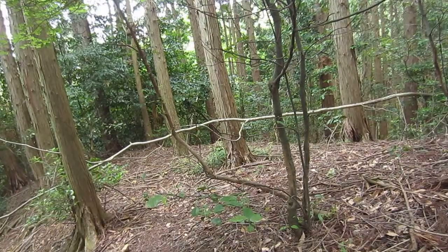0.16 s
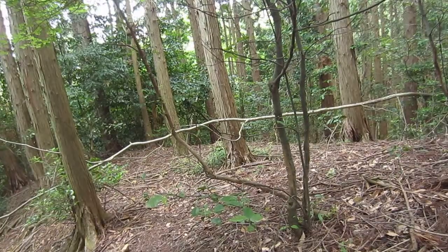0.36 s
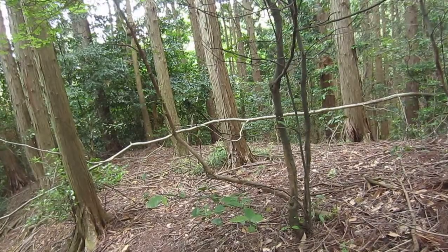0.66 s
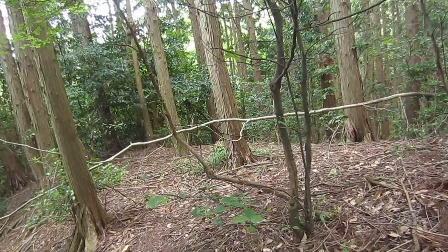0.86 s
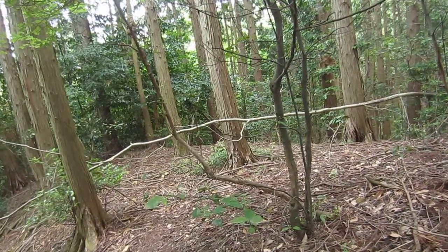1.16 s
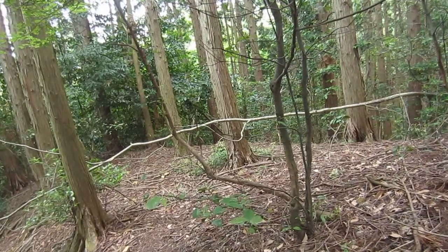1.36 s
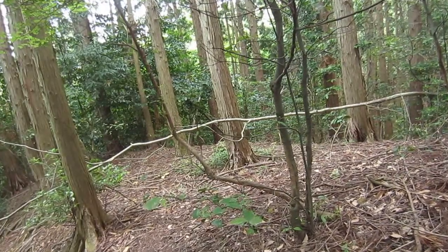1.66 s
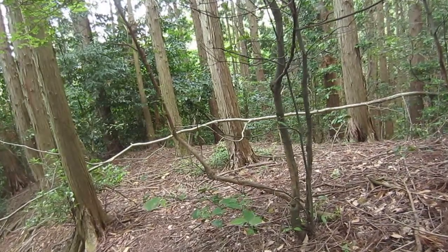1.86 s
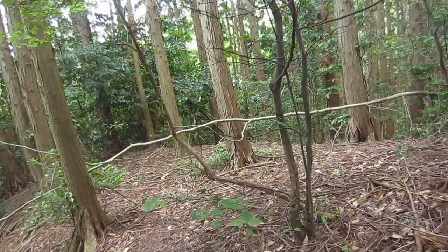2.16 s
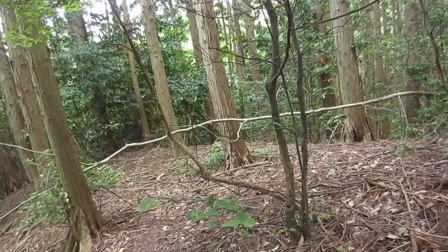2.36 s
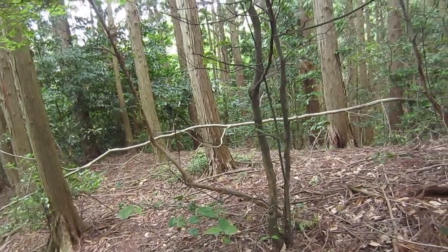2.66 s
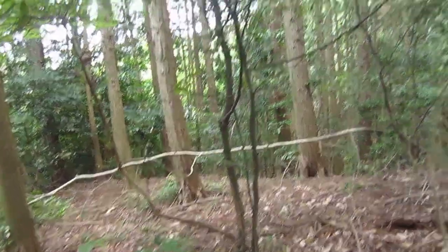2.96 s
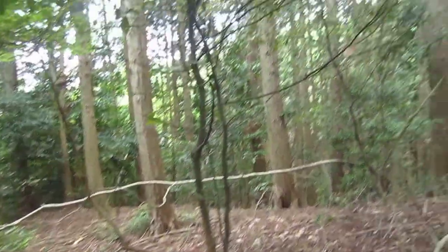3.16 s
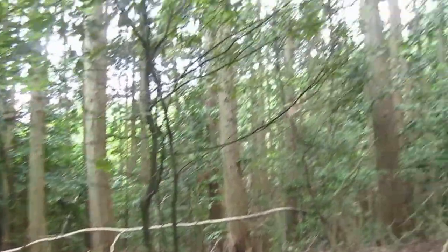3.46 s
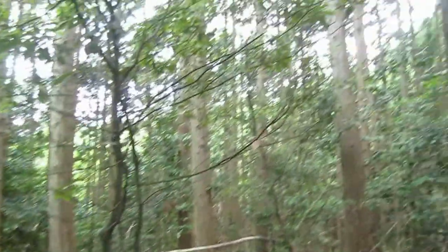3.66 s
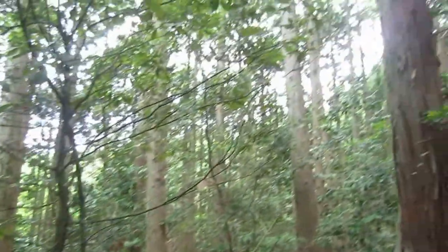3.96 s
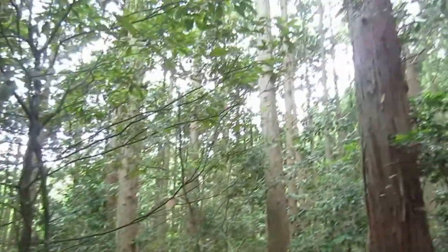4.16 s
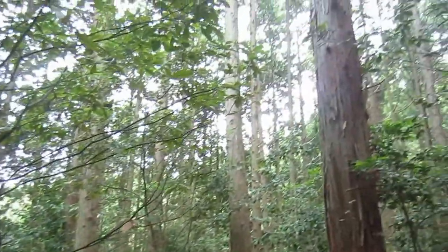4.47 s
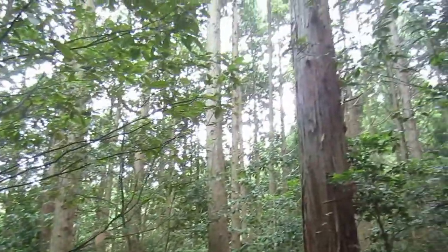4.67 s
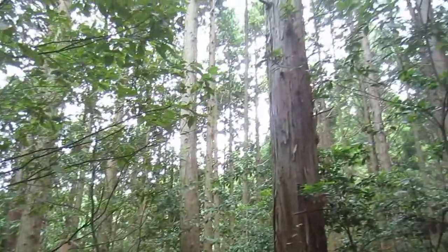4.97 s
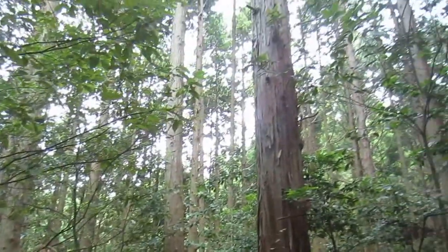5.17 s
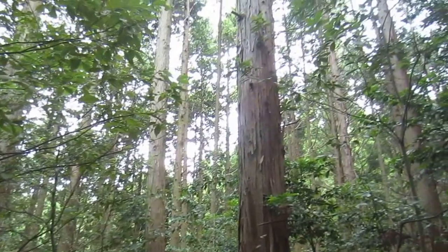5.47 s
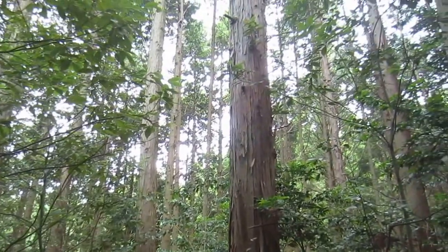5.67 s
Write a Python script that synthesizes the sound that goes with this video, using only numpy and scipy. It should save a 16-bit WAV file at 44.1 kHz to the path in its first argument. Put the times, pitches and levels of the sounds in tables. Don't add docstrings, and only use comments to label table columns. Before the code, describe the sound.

Six bright birdsong phrases of quick upward whistles and rippling trills ring among the trunks, over low air noise and faint camera ticks.

```python
import sys
import numpy as np
from scipy import signal
from scipy.fft import irfft
from scipy.io import wavfile
from scipy.ndimage import uniform_filter1d

SR = 44100
rng = np.random.default_rng(int(sys.argv[2]) if len(sys.argv) > 2 else 0)


def output_pcm(signal):
    pcm = np.clip(np.atleast_2d(signal).T, -1, 1) * 32767
    wavfile.write(sys.argv[1], SR, np.round(pcm).astype(np.int16))


def boost(x):
    u = np.asarray(x, float) / 20
    return 10 ** u


N = 256662


def singer():
    out = np.zeros((2, N))
    sing_opening(out)
    sing_whistles(out)
    sing_trills(out)
    sing_slurs(out)
    sing_far_birds(out)
    return out


def sing_opening(out):
    # time in seconds, pitch in Hz, level in dB.
    opening = [
        [(0, 3540, -39), (.03, 3345, -54), (.07, 3600, -53), (.085, 3780, -44.5), (.1, 4190, -44),
         (.122, 4210, -48.5)],
        [(.122, 3626, -50), (.155, 3600, -37), (.185, 3607, -54.5), (.29, 3600, -64)],
        [(.314, 2730, -63), (.34, 2597, -46), (.38, 2498, -49), (.415, 2434, -50.5), (.44, 2407, -44)],
        [(.42, 2730, -35.5), (.435, 3370, -55.5), (.447, 3838, -46), (.503, 3800, -40.5), (.53, 3807, -57.5),
         (.62, 3840, -64), (.72, 3780, -76)],
    ]
    opening_echo_db = [-2, -11, -0.5, -7]
    for note, echo_db in zip(opening, opening_echo_db):
        s, hz, db = np.transpose(note)
        t = np.arange(s[0], s[-1], 1 / SR)
        voice = syrinx(np.interp(t, s, hz), boost(np.interp(t, s, db)), edge_s=0.0048, warble=0.00057)
        add(out, s[0], voice, echo_db)


def sing_whistles(out):
    # start in seconds, length in seconds, held pitch in Hz, level in dB.
    whistles = [
        [(1.05, 0.067, 3257, -50), (1.278, 0.068, 3215, -48), (1.399, 0.022, 3147, -47.5)],
        [(1.887, 0.078, 3256, -44), (2.092, 0.081, 3150, -44.5), (2.2, 0.034, 3220, -48.5)],
        [(2.863, 0.084, 3222, -44.5), (3.055, 0.05, 3240, -41.5), (3.163, .04, 3180, -42)],
        [(3.694, 0.0477, 3299, -36), (3.897, 0.062, 3230, -38.5), (3.997, 0.053, 3252, -40.5)],
        [(4.502, 0.055, 3280, -37.5), (4.708, 0.055, 3194, -38.5), (4.813, 0.029, 3273, -34.5)],
        [(5.308, 0.053, 3252, -38), (5.499, 0.041, 3237, -40), (5.6, 0.043, 3235, -40)],
    ]
    # start pitch in Hz, rise in Hz per second,
    # Hz left to creep up after the knee.
    shapes = [(2280, 54000, 197), (2123, 60000, 150), (2697, 51200, 148.6)]
    for phrase in whistles:
        for (s, length, held_hz, db), (low_hz, scoop_hz_per_s, knee_hz) in zip(phrase, shapes):
            t = np.arange(0, length, 1 / SR)
            creep = held_hz - knee_hz * np.exp(-t / 0.0262)
            hz = np.minimum(low_hz + scoop_hz_per_s * t, creep)
            hz = uniform_filter1d(hz, size=200, mode="nearest")
            gain = boost(db - 0.014 * (creep - hz) - 2.6 * (2.5 - t / length))
            voice = syrinx(hz, gain, edge_s=0.0036, warble=0.0076, low_octave_db=-14)
            echo_db = 3 - 0.33 * (db + 43.5)
            add(out, s, voice, echo_db)


def sing_trills(out):
    # start in seconds, length in seconds, pitch in Hz, level in dB.
    trills = [
        (1.435, .105, 3178, -43),
        (2.236, .14, 3173, -41.5),
        (3.194, .105, 3140, -41.5),
        (4.033, .21, 3173, -38),
        (4.858, .21, 3197, -37),
        (5.641, .14, 3153, -38),
    ]
    flick_s, climb_hz, span_hz = 0.0348, 24.2, 165
    u = np.arange(0, flick_s, 1 / SR) / flick_s
    for s, length, hz, db in trills:
        for k in range(round(length / flick_s)):
            flick_hz = hz + k * climb_hz + span_hz * (u - 0.5)
            effort_db = db - 0.2 * k - 6 * max(k - 3.12, 0)
            gain = boost(effort_db - 9.4 * (1 - u) ** 0.64)
            add(out, s + k * flick_s, syrinx(flick_hz, gain))


def sing_slurs(out):
    # start in seconds, end pitch in Hz, level in dB.
    slurs = [
        (1.545, 2210, -41.5),
        (2.383, 2052, -41.5),
        (3.295, 2140, -41),
        (5.768, 2017, -40.5),
    ]
    for s, to_hz, db in slurs:
        add(out, s, slur(0.065, 3203, to_hz, db))


def sing_far_birds(out):
    # start in seconds, length in seconds, first pitch in Hz, last pitch in Hz, level in dB.
    far = [
        (2.7, .11, 4050, 4040, -82),
        (2.85, .1, 4040, 4010, -79),
        (4.25, .1, 4700, 4700, -81),
        (5.08, .12, 4150, 4050, -79),
        (4.53, .022, 5150, 4850, -70),
        (5.345, .022, 5000, 4900, -72),
        (3.24, .07, 6450, 6350, -77),
    ]
    for s, length, from_hz, to_hz, db in far:
        add(out, s, slur(length, from_hz, to_hz, db), echo_db=-13)


def slur(length, from_hz, to_hz, db):
    u = np.arange(0, length, 1 / SR) / length
    fade_db = -18 * np.clip((u - 0.7) / 0.32, 0, 1) ** 0.5
    hz = from_hz + (to_hz - from_hz) * (0.79 * u + 0.28 * u ** 4)
    return syrinx(hz, boost(db + fade_db))


def syrinx(hz, gain, edge_s=0.0038, warble=0.0042, low_octave_db=-42):
    t = np.arange(len(hz)) / SR
    unsteady_hz = hz * (1 + warble * wander(len(hz), span_s=0.019))
    phase = 2 * np.pi * np.cumsum(unsteady_hz) / SR
    flutter_db = 2.75 * wander(len(hz), span_s=0.01)
    throat_hz = 2640
    octave = boost(-42) + boost(low_octave_db) / (1 + (hz / throat_hz) ** 32)
    tone = np.sin(phase) + octave * np.sin(2 * phase) + boost(-52) * np.sin(3 * phase)
    to_nearest_end = np.minimum(t, t[-1] - t)
    fade = np.sin(np.pi / 2 * np.clip(to_nearest_end / edge_s, 0, 1)) ** 2
    return np.sqrt(2) * gain * boost(flutter_db) * fade * tone


def wander(count, span_s):
    window = np.hanning(int(span_s * SR))
    window /= np.linalg.norm(window)
    return signal.fftconvolve(rng.standard_normal(2 ** 14), window, "same")[:count]


def add(out, s, x, echo_db=0.0):
    i = max(int(s * SR), 0)
    x = x[:N - i]
    out[0, i:i + len(x)] += x
    out[1, i:i + len(x)] += x * boost(echo_db)


def wood(x):
    # time to fall by 60 dB in seconds, level in dB.
    trunks = [(0.299, 1.5), (.85, -6.5)]
    t = np.arange(int(1.5 * SR)) / SR
    scatter = rng.standard_normal(len(t)) * (1 - np.exp(-t / 0.0089))
    energy = np.zeros(len(t))
    for t60, db in trunks:
        tail = np.exp(-np.log(1000) * t / t60)
        energy += boost(2 * db) * tail ** 2 / np.sum(tail ** 2)
    echo = boost(3) * signal.fftconvolve(x, scatter * np.sqrt(energy))[:N]
    echo = signal.sosfilt(signal.butter(2, 2874, "high", fs=SR, output="sos"), echo)
    return signal.sosfilt(signal.butter(6, 4700, fs=SR, output="sos"), echo)


def camera():
    return whines() + card_writing() + handling_ticks()


def whines():
    # pitch in Hz, level in dB.
    whine_tones = [(13167, -92), (15704, -96), (15734, -96)]
    t = np.arange(N) / SR
    return sum(np.sqrt(2) * boost(db) * np.sin(2 * np.pi * hz * t) for hz, db in whine_tones)


def card_writing():
    # centre in Hz, width in Hz, level in dB.
    hisses = [(5400, 400, -78.5), (7000, 3000, -87), (10700, 100, -98), (10950, 200, -94)]
    first_s, every_s, length_s = -0.03, 1.002, 0.25
    t = np.arange(N) / SR
    writing = uniform_filter1d(1.0 * ((t - first_s) % every_s < length_s), size=256)
    noise = rng.standard_normal(N)
    return writing * sum(boost(db) * unit(band(band(noise, hz, w), hz, w)) for hz, w, db in hisses)


def handling_ticks():
    # start in seconds, peak level in dB, centre in Hz.
    ticks = [
        (3.3977, -52, 3600),
        (3.463, -57, 3800),
        (3.6701, -48.5, 4000),
        (3.7768, -49.5, 4600),
        (3.7954, -58, 4880),
        (4.239, -55, 3000),
        (4.2646, -58, 4500),
    ]
    out = np.zeros((2, N))
    dull = signal.butter(8, 9800, fs=SR, output="sos")
    for s, db, hz in ticks:
        crack = rng.standard_normal(512) * np.exp(-np.arange(512) / SR / 0.003)
        crack = signal.sosfilt(dull, band(crack, hz, 1.2 * hz))
        add(out, s, boost(db) * crack / np.abs(crack).max())
    return out[0]


def band(x, hz, width_hz):
    return signal.lfilter(*signal.iirpeak(min(hz, 0.45 * SR), hz / width_hz, fs=SR), x)


def unit(x):
    return x / np.sqrt(np.mean(x ** 2))


def air():
    # frequency in Hz, strength in dB per Hz.
    hiss_colour = [(12, -18.5), (25, -3), (58, 0.5), (120, -6.5), (310, -11), (630, -17), (1300, -21),
                   (2500, -26), (4200, -31.5), (8000, -36.5), (10000, -43), (11800, -60), (13000, -51),
                   (15200, -52)]
    hz, db = np.transpose(hiss_colour)
    f = np.maximum(np.arange(N // 2 + 1) * SR / N, 1)
    chance = rng.standard_normal(len(f)) + 1j * rng.standard_normal(len(f))
    colour = boost(np.interp(np.log(f), np.log(hz), db))
    return boost(-54) * unit(irfft(chance * colour, N))


def scene():
    direct, sent = singer()
    song = direct + wood(sent)
    song = song - band(song, 11500, 1200)
    return (song + air() + camera())[None]


def low_pass(x):
    return signal.sosfilt(signal.butter(12, 15750, fs=SR, output="sos"), x)


def record(dry):
    return low_pass(dry)


dry = scene()
out = record(dry)
output_pcm(out)
```